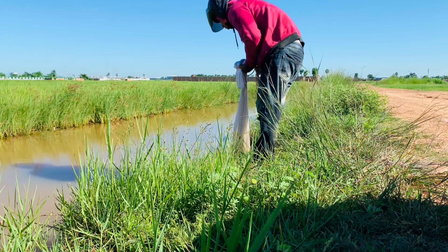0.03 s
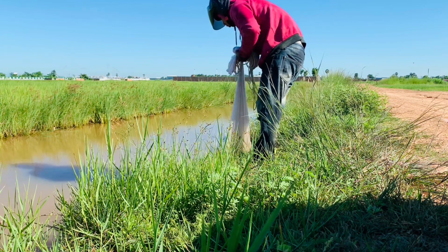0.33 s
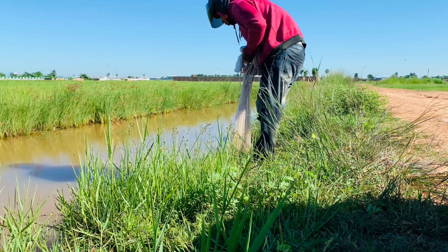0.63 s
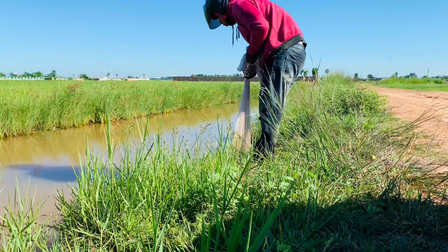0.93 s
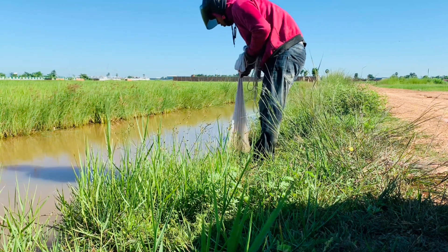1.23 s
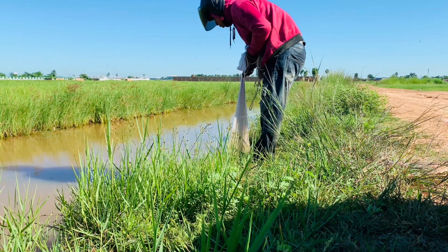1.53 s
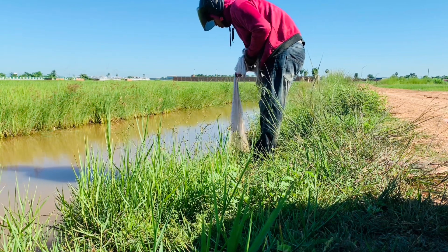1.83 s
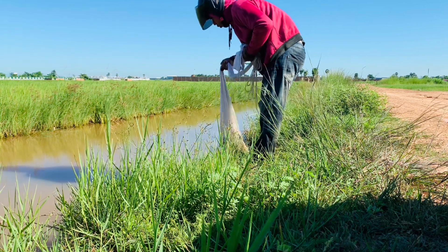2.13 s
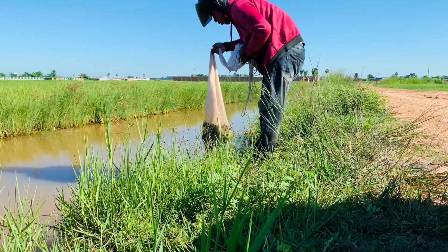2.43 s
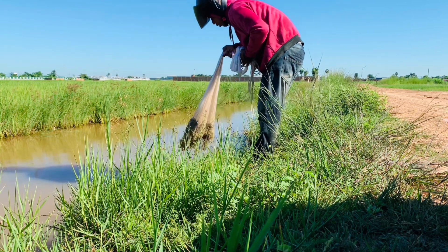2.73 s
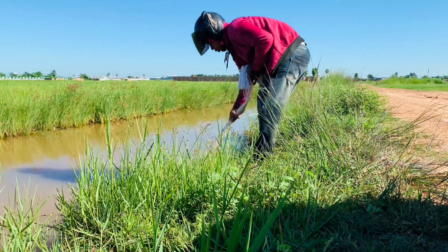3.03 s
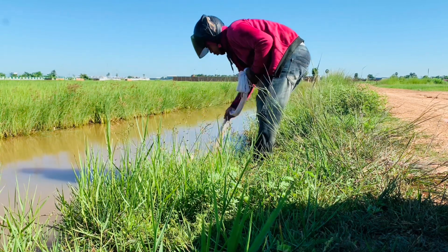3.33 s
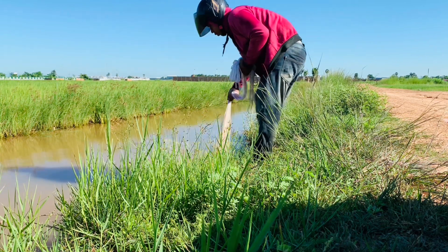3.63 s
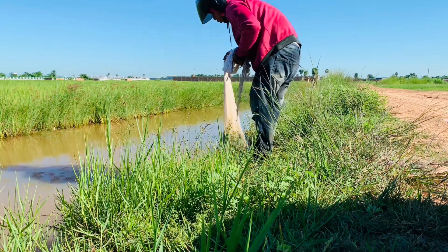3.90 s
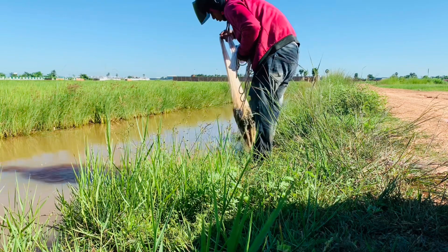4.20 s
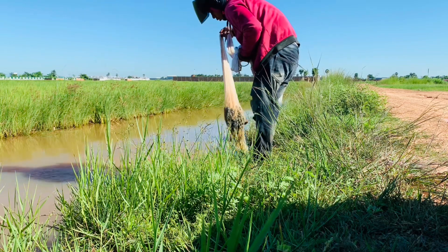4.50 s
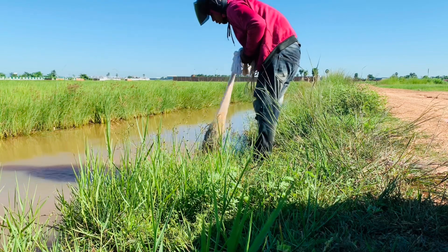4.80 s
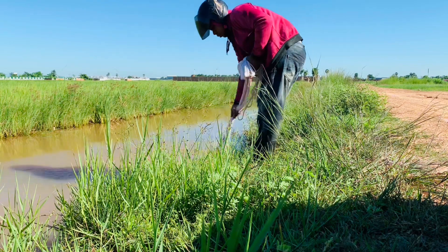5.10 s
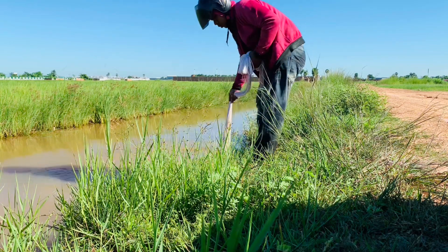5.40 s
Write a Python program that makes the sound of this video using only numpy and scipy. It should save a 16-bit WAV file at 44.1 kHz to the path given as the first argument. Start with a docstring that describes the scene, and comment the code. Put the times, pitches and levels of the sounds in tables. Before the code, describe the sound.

A wet net is pulled and dunked in a canal, splashing, then water drips and gurgles off the mesh outdoors.

```python
"""Hauling a cast net from a canal

Wet mesh, pulled hand over hand, rustles by friction and drips; twice its weighted hem slaps the water.
Trapped air rings as bubbles, the larger the lower, so the muddy water gurgles, streams and sloshes.
In the open fields insects shrill, birds chirp, a far engine drones, a knock sets something hollow
ringing in its modes, and a turbulent breeze buffets the microphone."""
import sys
import numpy as np
from scipy import signal
from scipy.io import wavfile
from scipy.ndimage import uniform_filter1d, map_coordinates

SR = 44100
rng = np.random.default_rng(int(sys.argv[2]) if len(sys.argv) > 2 else 0)


def log_audio(samples):
    """Write samples as a 16-bit WAV file to the path given in sys.argv[1]."""
    # one column per channel
    frames = np.atleast_2d(samples).T
    # limit to full scale, then quantise
    limited = np.clip(frames, -1, 1)
    pcm = np.round(limited * 32767).astype(np.int16)
    wavfile.write(sys.argv[1], SR, pcm)


N = 244755
TIME = np.arange(N) / SR

# the hem strikes the water: (time [s], spray level [dB], rise [s], fall [s], cavity level [dB],
# cavity frequency [Hz], flight of the thrown water [s], landing level [dB])
HEM_SLAPS = [(3.072, -28, 0.0069, 0.024, -31.5, 555, 0.243, -42.5),
             (5.078, -35.5, 0.017, 0.026, -43, 600, 0.22, -45)]


def from_db(db):
    """Amplitude ratio of a level in decibels."""
    return np.exp(np.asarray(db) * (np.log(10) / 20))


def unit_rms(x):
    """Normalisation to a mean power of 1."""
    return x / np.sqrt(np.mean(x ** 2) + 1e-20)


def gains(rows, fade_s=0.05):
    """One envelope for each level column, decaying exponentially outside the listed times."""
    times, *columns = np.transpose(rows)
    outside = np.maximum(0, np.maximum(times[0] - TIME, TIME - times[-1]))
    return [from_db(np.interp(TIME, times, db)) * np.exp(-outside / fade_s) for db in columns]


def swell(s, rise, fall):
    """Exponential growth to 1 at time s, then exponential decay."""
    return np.exp(-np.minimum(np.maximum(s - TIME, 0) / rise + np.maximum(TIME - s, 0) / fall, 40))


def level_at(spectrum, hz):
    """Spectral level in dB, interpolated over log frequency."""
    frequencies, levels = np.transpose(spectrum)
    return np.interp(np.log(hz), np.log(frequencies), levels)


def add(out, s, sound):
    """Superposition of a sound starting at time s."""
    start = int(np.clip(round(s * SR), 0, N - 1))
    out[start:start + len(sound)] += sound[:N - start]


def tone(hz):
    """A sinusoid whose phase is the integral of its frequency."""
    return np.sin(2 * np.pi * np.cumsum(hz) / SR)


def band(x, low, high, order=2):
    """Butterworth band-pass, edges in Hz."""
    sos = signal.butter(order, [low, min(high, .48 * SR)], "band", fs=SR, output="sos")
    return signal.sosfilt(sos, x)


def resonant_noise(hz, width_hz):
    """A damped resonator driven by white noise."""
    r = np.exp(-np.pi * width_hz / SR)
    feedback = [1, -2 * r * np.cos(2 * np.pi * hz / SR), r * r]
    return signal.lfilter([1, 0, -1], feedback, rng.standard_normal(N))


def drift(corner_hz):
    """Low-pass random fluctuation of rms 1."""
    step, settle = 40, 2000
    r = np.exp(-2 * np.pi * corner_hz * step / SR)
    slow = signal.lfilter([1], [1, -2 * r, r * r], rng.standard_normal(N // step + settle + 2))[settle:]
    return np.interp(np.arange(N) / step, np.arange(len(slow)), unit_rms(slow))


def noise(spectrum, flicker_db, bands):
    """Coloured noise of rms 1 with independent amplitude modulation in each band."""
    edges = np.geomspace(spectrum[0][0], spectrum[-1][0], bands + 1)
    white, out = rng.standard_normal((2, N)), np.zeros(N)
    for k, (low, high) in enumerate(zip(edges, edges[1:])):
        db = level_at(spectrum, np.sqrt(low * high)) + flicker_db * drift(36)
        out += band(white[k % 2], low, high) * from_db(db)
    return unit_rms(out)


def impacts(rows, fall_s):
    """A brief contact has a broad spectrum: each is a decaying burst of band-limited noise."""
    age, out = TIME[:SR // 20], np.zeros(N)
    for s, db, hz in rows:
        crack = band(rng.standard_normal(len(age)) * np.exp(-age / fall_s), hz / 1.86, hz * 1.41)
        add(out, s, from_db(db) * crack / np.abs(crack).max())
    return out


def bubble(hz, cycles, climb):
    """Trapped air resonates, swelling for some cycles; a positive climb is its rise to the surface."""
    age = np.arange(int(6 * cycles * SR / hz) + 8) * hz / (SR * cycles)  # 1 at the peak
    envelope = (age * np.exp(1 - age)) ** 2
    pitch = np.minimum(hz * (1 + climb * np.tanh(age - 1)), SR / 2)
    return envelope * tone(pitch)


def swarm(spectrum, per_s, cycles, spread_db, pitch_count):
    """A Poisson process of bubble-like pulses, high ones most often, held near rms 1."""
    birth, size, polarity, pick = rng.random((4, N))
    onsets = np.flatnonzero(birth < per_s / SR)
    strengths = from_db(spread_db * np.minimum(-np.log(1 - size[onsets]), 4))
    strengths *= np.sign(polarity[onsets] - .5)
    pitches = np.geomspace(spectrum[0][0], spectrum[-1][0], pitch_count)
    pitch_index = np.searchsorted(np.cumsum(pitches) / pitches.sum(), pick[onsets])
    out = np.zeros(N)
    for k, hz in enumerate(pitches):
        impulses = np.bincount(onsets[pitch_index == k], strengths[pitch_index == k], N)
        ringing = signal.oaconvolve(impulses, bubble(hz, cycles, climb=0.094))[:N]
        out += unit_rms(ringing) * from_db(level_at(spectrum, hz)) * np.sqrt(hz)
    out = unit_rms(out)
    return out / np.sqrt(uniform_filter1d(out ** 2, size=2600) + .02)


def traffic():
    """Far traffic merges into low broadband noise; one engine's periodic firing gives a drone."""
    # rumble spectrum: (frequency [Hz], spectral level [dB])
    rumble = [(22, -76), (35, -40), (60, -3), (90, 1), (130, -7), (200, -10.5), (300, -17), (500, -33),
              (1000, -33.5), (3000, -44.5), (8000, -108), (15000, -29.5)]
    engine = from_db(-61.5 + 1.4 * drift(9.9)) * tone(97 + 3 * drift(3.22))
    return from_db(-58.5) * noise(rumble, flicker_db=1.5, bands=20) + engine


def breeze():
    """Turbulence at the microphone makes low-frequency pressure fluctuations."""
    # strength of the breeze: (time [s], level [dB])
    gusts = [(0, -65.5), (4.6, -61.5), (5.22, -59), (5.31, -46.5), (5.4, -49.5), (5.455, -46.5),
             (5.55, -46)]
    # turbulence spectrum: (frequency [Hz], spectral level [dB])
    turbulence = [(22, 8.5), (45, -3), (90, -3.5), (160, -11.5), (300, -27), (700, -24)]
    envelope, = gains(gusts)
    return envelope * noise(turbulence, flicker_db=4, bands=8)


def insects(shrill_hz=7810, pulses_per_s=12.8, dip_depth=0.62):
    """Narrow-band resonance: the chorus pulses in amplitude, the nearest singer also in frequency."""
    beat = np.cumsum(pulses_per_s * (1 + .22 * drift(6))) / SR
    shrill = unit_rms(band(resonant_noise(shrill_hz, 220), shrill_hz - 330, shrill_hz + 280))
    speed = 1 - .009 * np.sin(2 * np.pi * beat)  # the pitch rises through each pulse
    singer = map_coordinates(shrill, [np.cumsum(speed)], order=3, mode="mirror")
    dips = np.clip(dip_depth + .2 * drift(2), 0, .9) * np.abs(np.cos(np.pi * beat)) ** 2.6
    chorus = unit_rms(band(rng.standard_normal(N), 7250, 7850))
    return band((1 - dips) * (from_db(-63) * singer + from_db(-73) * chorus), 6500, 8200, order=8)


def far_birds(length_s=0.14, sag=0.1, blur_hz=297):
    """Each call arches in pitch and level; random modulation over the distance broadens its spectrum."""
    # distant calls: (time [s], level [dB], top frequency [Hz])
    calls = [(0.192, -83, 4100), (.92, -75.5, 4230), (1.18, -76, 4300), (1.471, -75, 4280),
             (1.479, -74.5, 1640), (1.65, -70, 1630), (2.38, -76, 1974)]
    out, along = np.zeros(N), np.linspace(-1, 1, int(length_s * SR))
    for s, db, hz in calls:
        call = np.cos(np.pi * along / 2) * tone(hz * (1 - sag * along ** 2))
        add(out, s - length_s / 2, from_db(db) * call)
    return out * drift(blur_hz)


def small_bird(linear_share=0.223, bend=7.8):
    """Each chirp is a quick frequency sweep, made raspy by random modulation of pitch and level."""
    # chirps: (time [s], level [dB], start frequency [Hz], end frequency [Hz], length [s])
    chirps = [(0.401, -49, 7400, 4500, 0.023), (0.435, -47.5, 4800, 7600, 0.015),
              (0.566, -52.5, 7340, 3270, 0.014), (0.707, -44, 4340, 8100, 0.022),
              (1.274, -47.5, 4400, 7920, 0.011), (1.348, -51.5, 7500, 3020, 0.012),
              (1.522, -47, 3900, 7650, 0.011)]
    out = np.zeros(N)
    wobble = 1 + 0.013 * drift(450)
    for s, db, start_hz, end_hz, length in chirps:
        along = np.linspace(0, 1, int(length * SR))
        from_top = 1 - along if end_hz > start_hz else along
        glide = linear_share * from_top + (1 - linear_share) * from_top ** bend  # flatter at the top
        pitch = max(start_hz, end_hz) - abs(end_hz - start_hz) * glide
        pitch *= wobble[int(s * SR):][:len(along)]
        envelope = np.sqrt(np.abs(np.sin(np.pi * along)))
        add(out, s - length / 2, from_db(db) * envelope * tone(pitch))
    rasp_db = 5.5 * (drift(450) - 1.5)
    return out * from_db(rasp_db)


def hollow_knock(echo_s=0.089, echo_db=-5, echo_rise_s=0.017):
    """A struck hollow body rings in damped modes; a far bank reflects the ring with a softened onset."""
    # a faint contact, then the blow: (time [s], level [dB])
    blows = [(1.251, -77), (1.2835, -54.5)]
    # modes of the body: (frequency [Hz], level [dB], time to decay by 60 dB [s])
    modes = [(320, 2, 0.088), (490, 0, 0.1), (596, -1, 0.08), (648, 8, 0.22), (684, -8, 0.69),
             (1200, -12, 0.18), (1600, -22, 0.24)]
    age, out = TIME[:SR // 2], np.zeros(N)
    ring = sum(from_db(db - 60 * age / t60) * np.sin(2 * np.pi * hz * age) for hz, db, t60 in modes)
    for s, db in blows:
        tail = unit_rms(band(rng.standard_normal(len(age)), 320, 590)) * np.exp(-age / 0.12)
        add(out, s, from_db(db) * (ring + from_db(-6.5) * tail))
        add(out, s + echo_s, from_db(db + echo_db) * ring * np.minimum(age / echo_rise_s, 1))
    return out


def canal_banks(direct, echo_db=-21, decay_s=0.017):
    """Scattering from the grassy banks adds a short, dull echo to the direct sound."""
    age = TIME[:SR // 5]
    scatter = band(rng.standard_normal(len(age)), 230, 4800, order=1)
    scatter *= np.exp(-age / decay_s) * (age > .002)
    scatter /= np.sqrt(np.sum(scatter ** 2))
    return direct + from_db(echo_db) * signal.oaconvolve(direct, scatter)[:N]


def mesh(rest_db=-89.5):
    """Friction: the wet mesh rustles and catches with each pull, while weights and cord tap."""
    # sliding mesh: (frequency [Hz], spectral level [dB])
    sliding = [(400, 7), (800, 7), (1800, 12), (2900, -1.5), (4200, 13.5), (5800, -4.5), (7000, 9.5),
               (9500, -4.5), (15000, -2)]
    # catching threads and grass blades: (frequency [Hz], spectral level [dB])
    catching = [(1000, -1), (2000, -16), (3000, -16), (4500, 6), (7000, 6), (11000, -15)]
    # pulls through the hands: (time [s], level [dB], rise [s], fall [s], treble gain [dB])
    pulls = [(.28, -75.5, 0.042, 0.19, -29), (.42, -79, 0.08, 0.11, 2), (0.625, -77, 0.052, 0.071, 6.5),
             (1.114, -74, 0.012, 0.035, -2.5), (1.28, -75.5, 0.056, 0.076, -22),
             (1.951, -85.5, 0.013, 0.036, 9.5), (2.025, -70, 0.024, 0.031, -5.5),
             (2.15, -68.5, 0.028, 0.058, -4), (2.75, -93, 0.39, 0.97, 12.5)]
    # taps of lead weights and cord: (time [s], level [dB], frequency [Hz])
    taps = [(0.512, -58.5, 2330), (0.594, -51.5, 3300), (1.251, -50.5, 1060), (2.021, -46.5, 3350),
            (2.1695, -44.5, 6800), (2.175, -45, 6200), (2.7995, -48, 6000), (5.506, -40.5, 630),
            (5.5055, -50.5, 6240)]
    rustle = band(noise(sliding, flicker_db=2, bands=14), 300, 11500) * from_db(3 * drift(200))
    catches = swarm(catching, per_s=2200, cycles=2.5, spread_db=3.2, pitch_count=10)
    rub = from_db(8.5) * rustle + from_db(2.5) * catches
    middle = signal.sosfilt(signal.butter(1, 2500, fs=SR, output="sos"), rub)
    treble = rub - middle
    middle_power, treble_power = np.full((2, N), from_db(rest_db) ** 2)  # the mesh is never quite still
    for s, db, rise, fall, treble_db in pulls:
        pull = from_db(db) * swell(s, rise, fall)
        middle_power += pull ** 2
        treble_power += (pull * from_db(treble_db)) ** 2
    return np.sqrt(middle_power) * middle + np.sqrt(treble_power) * treble + impacts(taps, fall_s=0.0053)


def drips(spread_db=11, shower_cycles=2.9, rasp_db=2.4, echo_s=0.003, echo_db=-16):
    """Drops entrain air that rings as single plips or faint showers; each drip returns a faint echo 3 ms later."""
    # prominent bubbles: (time [s], level [dB], frequency [Hz], swell [cycles], pitch climb [ratio])
    plips = [(2.2307, -52.5, 1930, 4, 0.19), (2.6135, -55.5, 2400, 6.3, 0.14), (2.631, -59, 3150, 12, 0.11),
             (2.7994, -43, 3750, 4.6, 0.016), (2.8076, -46, 3550, 5.5, 0.27),
             (2.831, -49, 1040, 2.25, -0.2), (2.84, -52, 1270, 3.5, 0.27), (2.9319, -32.5, 4300, 3, -0.024),
             (2.9658, -45, 5000, 3.8, .25), (2.9922, -47, 6670, 7.9, 0.3), (3.004, -40.5, 5200, 5.4, 0.13),
             (3.015, -44.5, 3270, 7.2, 0.6), (3.034, -46.5, 1200, 3.8, .1), (3.038, -34.5, 4100, 6.3, 0.22),
             (3.27, -37.5, 1200, 2.1, 0.037), (3.272, -46, 2200, 4.5, .05), (3.286, -49, 1480, 3.5, -0.13),
             (3.5111, -45.5, 1320, 3.3, 0.12), (3.529, -39.5, 805, 1.6, -0.16),
             (3.5344, -35.5, 1200, 3.3, 0.36), (3.662, -33.5, 830, 2.6, 0.025),
             (3.678, -39.5, 790, 3.6, -0.059), (3.686, -32, 1600, 2.7, -0.035),
             (3.713, -38, 1180, 3, -0.073), (3.78, -43, 824, 3.5, 0.009), (3.8102, -39, 1940, 2.4, .05),
             (3.866, -39.5, 2220, 4.5, 0.39), (3.874, -41, 3520, 12, -0.023), (3.8932, -32.5, 5300, 5, 0.3),
             (3.905, -33, 4760, 3.5, 0.071), (3.9337, -39.5, 5340, 5.3, 0.18),
             (3.9857, -37.5, 4900, 4.1, 0.17), (4.007, -38, 320, 1.72, -0.056),
             (4.0096, -41, 4390, 9.1, 0.49), (4.024, -43, 286, 3.5, -0.0023),
             (4.0243, -43, 1380, 3.2, -0.0069), (4.0445, -40, 1550, 1.6, 0.29),
             (4.051, -41, 5250, 8.1, 0.55), (4.0814, -36, 491, 3.2, -0.0087),
             (4.1197, -35.5, 7600, 4.9, 0.27), (4.1873, -45, 6500, 4, 0.5), (4.211, -35, 4800, 4.1, 0.91),
             (4.2702, -36, 8000, 3.8, 0.4), (4.3347, -42, 920, 1.8, 0.1), (4.468, -31, 6560, 1.1, 0.3),
             (4.6147, -40.5, 1240, 2.6, 0.26), (4.86, -37.5, 1412, 2.24, 0.27),
             (4.955, -46, 587, 4, -0.073), (4.993, -40, 1184, 3.45, -0.013),
             (5.036, -29.5, 1240, 2.1, 0.15), (5.07, -32, 1256, 3.8, 0.48),
             (5.0813, -20.5, 1510, 1.33, -0.13)]
    # drops shed by the moving net: (start [s], end [s], rate [1/s], first level [dB],
    # last level [dB], largest pitch climb [ratio])
    showers = [(2.448, 3.002, 120, -82, -67.5, 0.077), (3.789, 4.121, 130, -56.5, -60, 0.14)]
    # spectrum of those drops: (frequency [Hz], level [dB])
    droplets = [(1900, -40), (3200, 16), (4500, 13.5), (7000, 10)]
    low_hz, high_hz = droplets[0][0], droplets[-1][0]
    out = np.zeros(N)
    for s, db, hz, cycles, climb in plips:
        add(out, s - cycles / hz, from_db(db) * bubble(hz, cycles, climb))
    for start, end, per_s, first_db, last_db, climb in showers:
        for along, pitch, size, steepness in rng.random((100, 4))[:int((end - start) * per_s)]:
            hz = low_hz * (high_hz / low_hz) ** np.sqrt(pitch)
            shower_db = first_db + along * (last_db - first_db)
            db = shower_db + level_at(droplets, hz) + spread_db * (2 * size - 1)
            drop = bubble(hz, shower_cycles * (.5 + steepness), climb * steepness)
            add(out, start + along * (end - start), from_db(db) * drop)
    out *= from_db(rasp_db * drift(400))
    return out + from_db(echo_db) * np.interp(TIME - echo_s, TIME, out)


def held_bubbles(attack_s=0.00069):
    """Tiny bubbles held under the surface are damped oscillators of steady pitch."""
    # ringing bubbles: (time [s], level [dB], frequency [Hz], fall [s])
    rings = [(3.815, -45, 3600, 0.0024), (3.889, -53, 3900, 0.0027), (3.971, -48, 3200, 0.003),
             (4.058, -54, 8470, .009), (4.108, -52, 2760, 0.0084)]
    out = np.zeros(N)
    for s, db, hz, fall in rings:
        envelope = from_db(db) * swell(s + attack_s, attack_s / 2, fall)
        out += envelope * np.sin(2 * np.pi * hz * (TIME - s))
    return out


def slosh(waver=0.03, swing_db=5.5):
    """Water shoved through the sinking mesh excites pocket resonances that wander in pitch and level."""
    # course of the slosh: (time [s], level [dB], pitch [ratio])
    course = [(4.22, -59, 1.11), (4.399, -58, 0.98), (4.55, -67, 1.35), (4.629, -55.5, 1.18),
              (4.77, -54, 1.16), (4.87, -47.5, 1.05), (4.969, -50, 0.99), (5.04, -41, 0.9)]
    # resonant pockets: (frequency [Hz], bandwidth [Hz], level [dB])
    pockets = [(550, 150, -25), (790, 130, -9), (1240, 160, -6), (1600, 270, -11.5), (2100, 480, -12.5)]
    envelope, = gains([row[:2] for row in course])
    times, _, pitch_ratios = np.transpose(course)
    out = np.zeros(N)
    for hz, width_hz, db in pockets:
        pocket = unit_rms(band(resonant_noise(hz, width_hz), hz / 1.3, hz * 1.3))
        speed = np.interp(TIME, times, pitch_ratios) * (1 + waver * drift(8))
        wandering = map_coordinates(pocket, [np.cumsum(speed)], order=1, mode="mirror")
        out += from_db(db + swing_db * drift(26)) * wandering
    return envelope * out


def agitation(gush_width_octaves=0.73):
    """Incoherent sources add in power, giving the envelopes of glug, gurgle, splash and spray."""
    # water draining off the lifted net: (time [s], bubbling level [dB], spray level [dB])
    draining = [(3.56, -73, -67), (3.608, -56.5, -56.5), (3.744, -50.5, -54), (3.94, -54, -54),
                (4.268, -54, -60.5), (4.598, -55.5, -59), (4.76, -59, -54.5), (4.918, -67, -55.5),
                (5.0, -69, -57.5)]
    # folds of the net surface and empty: (time [s], level [dB], centre frequency [Hz])
    gushes = [(3.041, -42, 3570), (3.537, -50, 1120), (3.608, -50, 1500), (3.665, -49.5, 840),
              (3.71, -48.5, 2170), (3.795, -49, 1130), (3.81, -43.5, 3600), (3.886, -40.5, 4500),
              (3.966, -48.5, 3630), (4.009, -45, 350), (4.078, -41.5, 480), (4.088, -46, 1500),
              (4.174, -43, 480), (4.336, -50.5, 650), (4.709, -50, 2090)]
    # centres of the bubble classes: (glug [Hz], gurgle [Hz], splash [Hz], spray [Hz])
    class_hz = (360, 720, 1400, 4500)
    # churning at a slap: (glug [dB], gurgle [dB], splash [dB], spray [dB])
    churn_db = (-59.5, -48, -41, -43.5)
    # the hollow fills in again: (glug [dB], gurgle [dB], splash [dB], spray [dB])
    wake_db = (-55.5, -51.5, -48.5, -54.5)
    # foam bursts afterwards: (glug [dB], gurgle [dB], splash [dB], spray [dB])
    foam_db = (-75, -60, -54.5, -57)
    bubbling, spraying = gains(draining, fade_s=0.038)
    bubbling *= from_db(-0.8 * drift(3.1))  # uneven spurts
    power = np.array([np.zeros(N), from_db(-2) * bubbling, from_db(-1.5) * bubbling, spraying]) ** 2
    for s, db, hz in gushes:
        shares = np.exp(-(np.log2(np.array(class_hz) / hz) / gush_width_octaves) ** 2)
        gush = from_db(db) * swell(s, rise=0.012, fall=0.027 * (1000 / hz) ** 0.35)  # big bubbles linger
        power += np.outer(shares / shares.sum(), gush ** 2)
    first_slap_db = HEM_SLAPS[0][1]
    for s, db, spray_rise, *_ in HEM_SLAPS:
        churn = swell(s, rise=2.48 * spray_rise, fall=0.047)
        wake = swell(s + 0.2, rise=0.047, fall=0.047)
        foam = from_db(db - first_slap_db) * swell(s + 0.23, rise=0.047, fall=0.16)
        for levels, envelope in (churn_db, churn), (wake_db, wake), (foam_db, foam):
            power += np.outer(from_db(levels), envelope) ** 2
    return np.sqrt(power)


def stirred_water(merged_share=0.24):
    """Bubble resonance rises as size falls, from glug to fizz; merged streams blur into a wash."""
    # air pockets: (frequency [Hz], spectral level [dB])
    glug_spectrum = [(255, -3), (310, 5.5), (400, 1), (500, -4)]
    # large bubbles: (frequency [Hz], spectral level [dB])
    gurgle_spectrum = [(480, -7), (600, -18.5), (770, -1), (900, -37)]
    # small bubbles: (frequency [Hz], spectral level [dB])
    splash_spectrum = [(900, -3), (1300, 13), (1700, -1.5), (2100, 10), (2500, -42)]
    # finest drops: (frequency [Hz], spectral level [dB])
    spray_spectrum = [(2500, 1.5), (3600, 9.5), (5500, -0.5), (7800, 5.5), (10000, -14), (12500, 1.5),
                      (15000, -52)]
    # merged fizz: (frequency [Hz], spectral level [dB])
    mist_spectrum = [(900, -33), (1400, 11), (2200, 7.5), (2900, 15), (4000, 15), (7500, 7.5), (10000, 2.5),
                     (13000, -1.5), (15500, -41)]
    glug, gurgle, splash, spray = agitation()
    cavities = swarm(glug_spectrum, per_s=140, cycles=2, spread_db=3, pitch_count=5)
    large = swarm(gurgle_spectrum, per_s=320, cycles=2.4, spread_db=3.5, pitch_count=6)
    small = swarm(splash_spectrum, per_s=1400, cycles=2.5, spread_db=3.8, pitch_count=10)
    fine = swarm(spray_spectrum, per_s=3500, cycles=2.4, spread_db=4.2, pitch_count=16)
    bubbling = gurgle * from_db(-1) * large + splash * from_db(0.5) * small
    wash = gurgle * unit_rms(band(rng.standard_normal(N), 315, 830))
    wash += splash * noise(splash_spectrum, flicker_db=8.5, bands=5)
    fizz = spray * from_db(-3) * (fine + 1.4 * noise(mist_spectrum, flicker_db=3, bands=12))
    return glug * cavities + np.sqrt(1 - merged_share) * bubbling + np.sqrt(merged_share) * wash + fizz


def smacks():
    """Clots of water strike the surface, each radiating a sharp impact transient."""
    # falling clots: (time [s], level [dB], frequency [Hz])
    clots = [(3.0675, -21.5, 1900), (3.0725, -19.5, 2530), (3.315, -30.5, 4400), (3.531, -39, 3860),
             (3.5445, -37.5, 3260), (3.7085, -31, 4530), (3.726, -40, 3600), (3.789, -34, 5500),
             (3.8895, -34, 4800), (3.9627, -32.5, 8100), (4.0924, -37.5, 6440), (4.338, -41, 7700),
             (5.0582, -35, 6000), (5.0812, -27, 2330)]
    return impacts(clots, fall_s=0.0037)


def hem_slaps():
    """Each impact of the hem opens a resonant cavity and throws a spray that lands a moment later."""
    # dense spray: (frequency [Hz], spectral level [dB])
    spectrum = [(700, 9), (1000, -10), (1350, 6.5), (2200, 1.5), (3000, 4.5), (5500, 4), (8000, 2),
                (11000, -9.5), (15000, -15)]
    spray, plunge = np.zeros((2, N))
    for s, spray_db, rise, fall, cavity_db, hz, flight, landing_db in HEM_SLAPS:
        spray += from_db(spray_db) * swell(s, rise, fall)
        spray += from_db(landing_db) * swell(s + flight, rise=0.0052, fall=0.031)
        add(plunge, s - 2 / hz, from_db(cavity_db) * bubble(hz, cycles=2, climb=.1))
    return spray * swarm(spectrum, per_s=22000, cycles=2.4, spread_db=1, pitch_count=18) + plunge


def scene():
    """Superposition in one channel: water and net between the banks, and the fields around them."""
    near = stirred_water() + slosh() + drips() + 2 * held_bubbles() + smacks() + hem_slaps() + mesh()
    canal = canal_banks(near)
    fields = hollow_knock() + small_bird() + far_birds() + insects() + traffic() + breeze()
    return (canal + fields)[None]


def record(dry, low_hz=39, high_hz=15700):
    """Band limiting: steep filters remove the deepest bass and the highest treble."""
    thinned = signal.sosfilt(signal.butter(7, low_hz, "high", fs=SR, output="sos"), dry)
    return signal.sosfilt(signal.ellip(10, .1, 80, high_hz, fs=SR, output="sos"), thinned)


dry = scene()
out = record(dry)
log_audio(out)
```